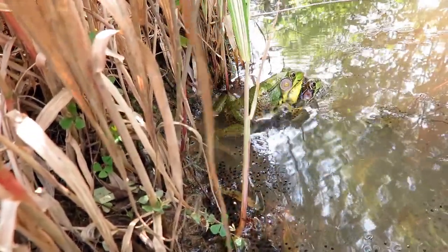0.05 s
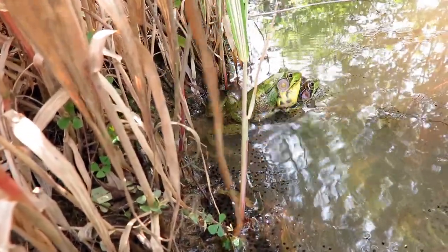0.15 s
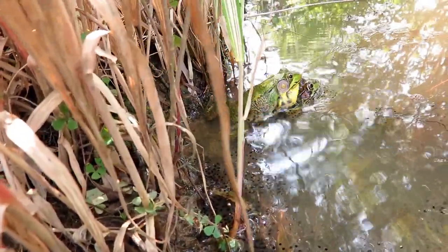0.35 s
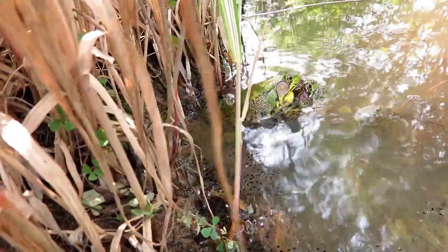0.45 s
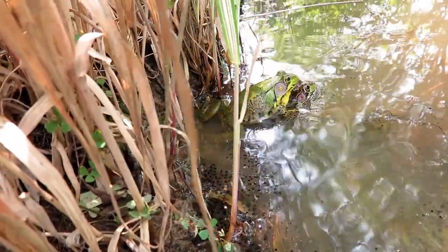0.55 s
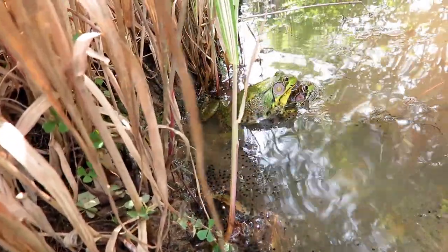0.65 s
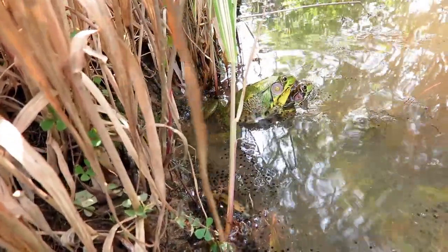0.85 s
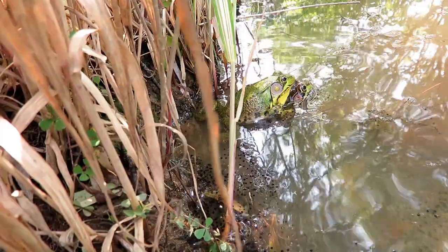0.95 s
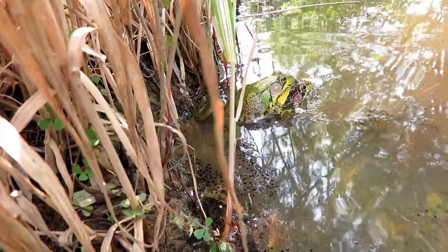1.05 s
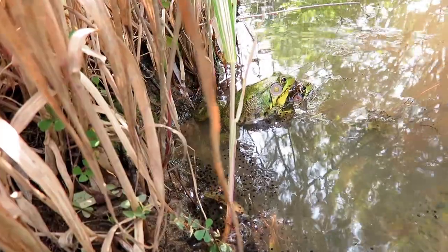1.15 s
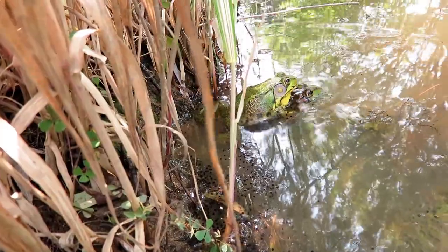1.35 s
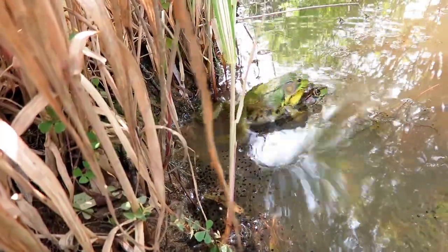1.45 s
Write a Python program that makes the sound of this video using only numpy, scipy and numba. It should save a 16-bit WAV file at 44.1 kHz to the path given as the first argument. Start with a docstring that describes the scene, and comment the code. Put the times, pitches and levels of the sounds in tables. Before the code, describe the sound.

A green frog calls once, close by, at about 0.2 seconds: a hard pluck like a loose banjo string, then a throaty buzz that sags in pitch and fades by 0.45 seconds. A low wavering hum and soft hiss of pond water run underneath, dipping with the call and slowly swelling back. A distant bird gives a few faint, thin chirps between 0.65 and 1.1 seconds.

```python
"""A pond's edge: a low, wavering hum under the soft hiss of water and reeds. At 0.2 s a green frog
gives one call like a loose banjo string: a hard pluck of snaps, then a buzz of throat pulses that
rings its vocal sac, sags in pitch and fades. The pluck overloads a gain control, which ducks the
whole scene. As the background slowly swells back, a distant bird chirps through the trees."""
import sys
import numpy as np
from scipy import signal
from scipy.fft import rfft, irfft
from scipy.io import wavfile
from scipy.ndimage import uniform_filter1d
from numba import njit

SR = 44100
rng = np.random.default_rng(int(sys.argv[2]) if len(sys.argv) > 2 else 0)


def pcm_store(signal):
    """Save signal as 16-bit PCM."""
    levels = np.round(np.clip(np.atleast_2d(signal), -1, 1) * 32767)
    wavfile.write(sys.argv[1], SR, levels.astype(np.int16).T)


N = 66150


def undb(db):
    return 10 ** (np.asarray(db) / 20)


def unit(x):
    return x / np.sqrt(np.mean(x ** 2))


def pan(db):
    """Stereo gains, the left db above the right."""
    return undb(np.array([[db], [-db]]) / 2)


def widen(mid, side):
    """Stereo from mid and side."""
    return np.array([mid + side, mid - side])


@njit
def svf(x, hz, k):
    """State-variable filter with a moving centre: rows are low, band and high."""
    y, b, l = np.empty((3, len(x))), 0., 0.
    for i in range(len(x)):
        g = np.tan(np.pi * hz[i] / SR)
        v = (b + g * (x[i] + 1e-18 - l)) / (1 + g * (g + k[i]))
        low = l + g * v
        b, l = 2 * v - b, 2 * low - l
        y[0, i], y[1, i], y[2, i] = low, k[i] * v, x[i] - k[i] * v - low
    return y


def band(x, hz, width):
    """One resonance, its width in Hz."""
    hz = hz * np.ones(N)
    return svf(x, hz, width / hz)[1]


def lowpass(x, hz):
    """Steep low-pass with a flat top."""
    for k in 2 * np.sin(np.radians([75, 45, 15])):
        x = svf(x, hz * np.ones(N), np.full(N, k))[0]
    return x


def walk(rate):
    """Smooth random drift with a spread near 1."""
    hold = int(SR / rate)
    steps = np.repeat(rng.standard_normal(200), hold)[:N]
    return unit(uniform_filter1d(uniform_filter1d(steps, hold), hold))


def colour(x, points):
    """EQ a sound through (Hz, dB) points."""
    hz, db = np.array(points).T
    f = np.maximum(np.fft.rfftfreq(N, 1 / SR), 1)
    return irfft(rfft(x) * undb(np.interp(np.log(f), np.log(hz), db)), N)


def noise_pair(eq):
    """Two independent noises of one colour, each at unit RMS."""
    return [unit(colour(rng.standard_normal(N), eq)) for _ in range(2)]


def click(at):
    """One band-limited pulse."""
    offset = np.arange(N) - at * SR
    return np.sinc(offset) * np.sinc(offset / 8) * (np.abs(offset) < 8)


def scatter(x, t60):
    """Diffuse outdoor tail, different in each ear."""
    t = np.arange(SR // 2) / SR
    tail = rng.standard_normal((2, len(t))) * np.exp(-np.log(1000) * t / t60)
    return signal.fftconvolve(x[None], tail / np.sqrt(np.sum(tail ** 2) / 2), axes=1)[:, :N]


def hum(waver_db=1.8, drift=.005, rumble_db=-38):
    """Wavering low tones, perhaps a distant motor, over a nearly mono rumble."""
    # The hum's tones. Each row: pitch in Hz, level in dB.
    partials = [(66, -44.5), (104.5, -43.5), (157, -40), (210, -42), (421, -60)]
    # The rumble's colour. Each row: frequency in Hz, relative level in dB.
    rumble_eq = [(22, -32), (45, -14), (65, -7), (100, 0.5), (135, -4.5), (195, -7), (245, -12),
                 (320, -27.5), (600, -54.5)]
    tones = 0
    for hz, db in partials:
        level = np.sqrt(2) * undb(db + waver_db * walk(33))
        cycles = rng.random() + np.cumsum(hz * (1 + drift * walk(5.4))) / SR
        tones += level * np.sin(2 * np.pi * cycles)
    mid, side = noise_pair(rumble_eq)
    return tones + undb(rumble_db) * widen(mid, undb(-27) * side)


def water(level_db=-44.5, ripple_db=.17):
    """Soft hiss of rippling water and reeds, widest at the very top."""
    # The hiss's colour. Each row: frequency in Hz, relative level in dB.
    hiss_eq = [(25, -7), (200, 4), (420, -2), (700, -5.5), (1400, -12), (3000, -16), (5500, -22),
               (8500, -31.5), (12500, -38), (15500, -42)]
    # Its stereo width. Each row: frequency in Hz, side over mid in dB.
    side_eq = [(100, -2), (1000, 0.5), (2500, -6), (5000, -5.5), (12000, 5.5)]
    mid, side = noise_pair(hiss_eq)
    hiss = widen(mid, colour(side, side_eq))
    return hiss * undb(level_db + ripple_db * walk(14)) * pan(-.5)


def bird(t, roughness=.022, woods_db=3):
    """Thin, distant gliding notes, smeared by the trees."""
    # Each row: start and length in seconds, first and last pitch in Hz, level in dB.
    notes = [(0.649, .014, 3970, 6250, -46), (0.657, .012, 6040, 8100, -48),
             (0.675, 0.011, 5750, 6500, -44.5), (0.792, 0.021, 3290, 2980, -55),
             (.985, 0.113, 6120, 5820, -63)]
    flutter = 1 + roughness * unit(lowpass(rng.standard_normal(N), hz=467))
    song = 0
    for at, length, start_hz, end_hz, db in notes:
        progress = np.clip((t - at) / length, 0, 1)
        hz = (start_hz + (end_hz - start_hz) * progress) * flutter
        song += undb(db) * np.sin(np.pi * progress) * np.sin(2 * np.pi * np.cumsum(hz) / SR)
    return song + undb(woods_db) * scatter(song, t60=.35)


def rasp(gate, hz=11300, width_hz=3200):
    """Thin fizz on each pulse of the buzz."""
    fizz = band(band(rng.standard_normal(N), hz, width_hz), hz, width_hz)
    return undb(-47.5) * gate * unit(fizz)


def crackle(pulses, decay_s=.0025):
    """A short burst of noise after every pulse, partly different in each ear."""
    # The burst's colour. Each row: frequency in Hz, relative level in dB.
    burst_eq = [(300, -30.5), (1500, -4), (3300, 3.5), (4000, -13), (4900, -19), (7000, -24), (9000, -30),
                (12000, -23), (15500, -20.5)]
    envelope = signal.lfilter([1], [1, -np.exp(-1 / (decay_s * SR))], pulses)
    mid, side = noise_pair(burst_eq)
    return undb(-21) * envelope * widen(mid, undb(-20.5) * side)


def throat_ring(pulses):
    """The taut throat rings brightly when a hard pulse strikes it."""
    # Throat resonances. Each row: centre in Hz, width in Hz, gain in dB.
    modes = [(1740, 53, -12.5), (2066, 196, -14.5), (3130, 300, -32), (4750, 260, -38)]
    # How well the throat radiates. Each row: frequency in Hz, gain in dB.
    radiation = [(500, -30), (1200, -10), (1600, 0), (3500, -1), (4000, -8), (4800, -3), (5600, -15),
                 (7500, -32), (14000, -55)]
    return colour(sum(undb(db) * band(pulses, hz, width) for hz, width, db in modes), radiation)


def vocal_sac(t, pulses, slack_at_s=.241, slackening_s=.005):
    """The body of the call: the sac's resonances drop as it loses its tension."""
    # Each row: slack centre in Hz, width in Hz, gain in dB, share by which tension raises the centre.
    modes = [(438.3, 166.6, -1.5, 0.19), (565, 350, -7.5, .08), (759, 130, -12, 0.12),
             (1349, 92, -13.5, 0.13)]
    # How well the sac radiates. Each row: frequency in Hz, gain in dB.
    radiation = [(120, -20), (260, -11), (380, -3.5), (1400, -4.5), (1580, -7.5), (2400, -32), (4000, -58)]
    tension = .5 - .5 * np.tanh((t - slack_at_s) / (2 * slackening_s))
    body = sum((-1) ** k * undb(db) * band(pulses, hz * (1 + rise * tension), width)
               for k, (hz, width, db, rise) in enumerate(modes))
    return colour(body, radiation)


def frog(t, uneven_db=2.1, bank_db=-17):
    """Snaps, then a slowing pulse train, drive sac and throat; the bank adds a short tail."""
    # The opening pluck. Each row: time in seconds, sac drive in dB, throat drive in dB.
    snaps = [(.2066, -39, -15), (.2107, 8, 6.5), (.2150, 2.5, 1.5), (.2190, 12.5, 8), (.2217, 7, 8.5)]
    # The buzz's envelope. Each row: time in seconds, sac drive in dB, throat drive in dB.
    buzz = [(.228, 7, 1.5), (.24, 5, 2), (0.247, 0, 4), (0.259, 3, -25), (.28, -3, -27),
            (.312, -2.5, -28.5), (0.379, -12, -47.5), (0.43, -24, -60)]
    # The buzz's sagging pitch. Each row: time in seconds, pulse rate in Hz.
    pitch = [(.2281, 190), (.235, 165), (.249, 166), (.262, 139), (.272, 134), (.285, 134), (.312, 134.5),
             (.335, 128.5), (.38, 123), (.42, 102), (.43, 100)]
    pitch_s, rate_hz = np.array(pitch).T
    buzz_s, sac_db, throat_db = np.array(buzz).T
    sounding = (t >= pitch_s[0]) & (t <= pitch_s[-1])
    cycles = np.cumsum(np.interp(t, pitch_s, rate_hz) * sounding) / SR
    onsets = np.append(pitch_s[0], t[np.searchsorted(cycles, np.arange(1, cycles[-1]))])
    accents = uneven_db * rng.standard_normal(80)
    pulses = snaps + [(at, np.interp(at, buzz_s, sac_db) + db, np.interp(at, buzz_s, throat_db) + db)
                      for at, db in zip(onsets, accents)]
    sac_drive = sum(click(at) * undb(db) for at, db, _ in pulses)
    throat_drive = sum(click(at) * undb(db) for at, _, db in pulses)
    makeup = SR / (2 * rate_hz.mean())  # brings a click train's harmonics near unit level
    sac = makeup * vocal_sac(t, sac_drive)
    ring = makeup * throat_ring(throat_drive)
    gate = np.exp(-(cycles % 1) / .4) * undb(np.interp(t, buzz_s, sac_db) / 2) * sounding
    bright = ring + rasp(gate) + crackle(throat_drive)
    return sac * pan(-1) + bright * pan(-3) + undb(bank_db) * scatter(sac + ring, t60=.13)


def scene():
    t = np.arange(N) / SR
    return frog(t) + hum() + water() + bird(t)


@njit
def duck(over_db, attack_s, hold_s, release_s):
    """Gain reduction in dB: rises fast with an overload, holds, then relaxes."""
    out, cut, wait = np.empty(len(over_db)), 0., 0.
    for i in range(len(over_db)):
        if over_db[i] > cut:
            cut += (over_db[i] - cut) / (attack_s * SR)
            wait = hold_s
        elif wait > 0:
            wait -= 1 / SR
        else:
            cut -= cut / (release_s * SR)
        out[i] = cut
    return out


def record(dry):
    """Gain control, rounded peaks and a steep top cut."""
    threshold, top_hz = .53, 15800
    over_db = 20 * np.log10(np.maximum(np.abs(dry).max(axis=0) / threshold, 1))
    ducked = dry * undb(-duck(over_db, attack_s=.0008, hold_s=.3, release_s=.35))
    rounded = 1.101 * np.tanh(ducked)
    return signal.sosfilt(signal.ellip(8, .2, 70, top_hz, fs=SR, output="sos"), rounded)


dry = scene()
out = record(dry)
pcm_store(out)
```